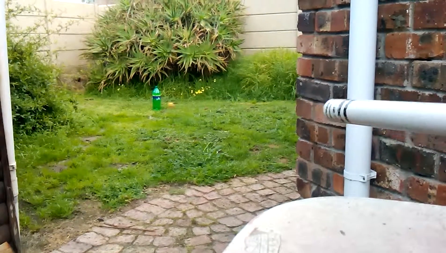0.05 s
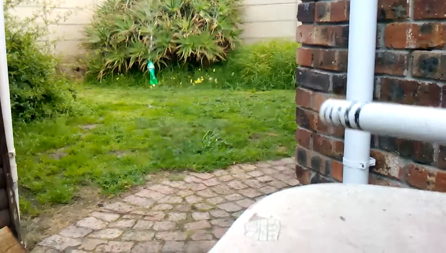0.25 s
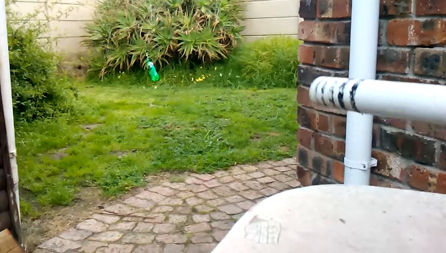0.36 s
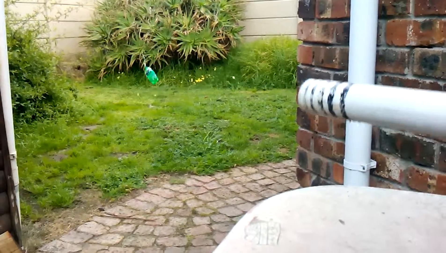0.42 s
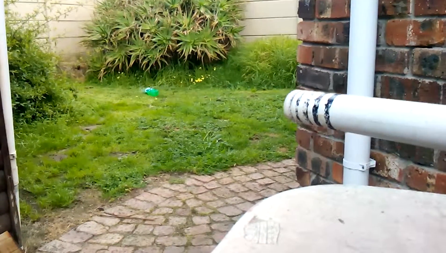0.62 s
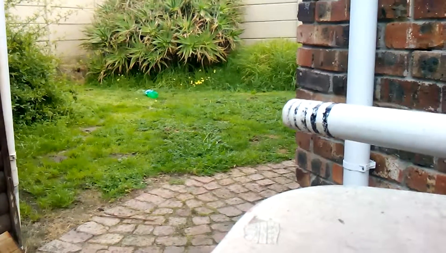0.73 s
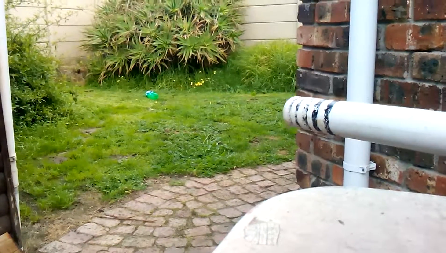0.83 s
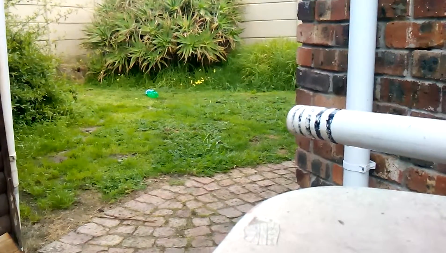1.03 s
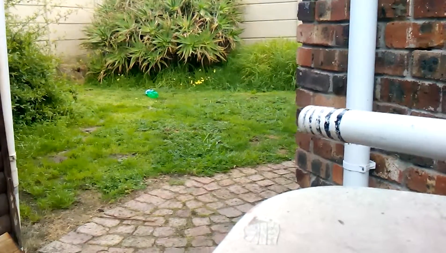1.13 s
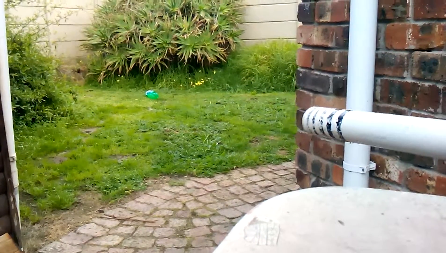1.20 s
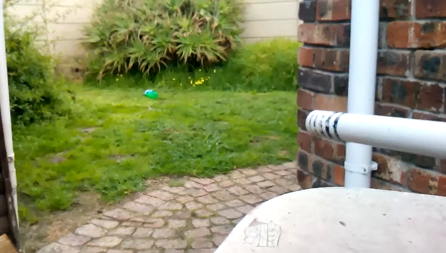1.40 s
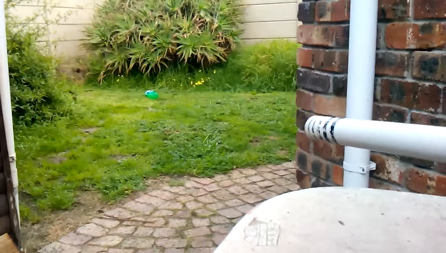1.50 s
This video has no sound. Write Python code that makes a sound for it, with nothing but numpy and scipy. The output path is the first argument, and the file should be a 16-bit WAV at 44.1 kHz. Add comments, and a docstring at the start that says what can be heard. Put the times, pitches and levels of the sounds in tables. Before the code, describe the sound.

An air-driven pipe cannon clicks, hisses briefly and fires an overloaded bang outdoors beside a phone microphone; short echoes, heavy bumps and plastic ticks follow, then lighter pipe knocks fade into a quiet yard.

```python
"""Air cannon in a yard

An air-driven pipe cannon fires in a walled yard beside a hand-held phone: trigger clicks, leaking air, an
overloading blast and its echoes, all made of shaped noise. Bumps are short sagging swings, plastic ticks and
two sharp early echoes are fading noise, and the knocked pipe and a small metal fitting ring in decaying modes.
Under them are a low handling rumble with thin squeaks, and a quiet yard with a cricket, a hiss and faint pairs
of steady high tones."""
import sys
import numpy as np
from scipy import signal
from scipy.fft import rfft, irfft
from scipy.io import wavfile
from scipy.ndimage import uniform_filter1d

SR = 44100
rng = np.random.default_rng(int(sys.argv[2]) if len(sys.argv) > 2 else 0)


def ratio_of_db(decibels):
    """Turn decibels (scalar or array-like) into linear amplitude factors; 0 dB maps to 1."""
    return 10 ** (np.asarray(decibels, float) / 20)


def master(y):
    """Save y as 16-bit WAV."""
    cut = np.clip(np.atleast_2d(y).T, -1, 1)
    pcm = np.round(cut * 32767)  # scale
    wavfile.write(sys.argv[1], SR, pcm.astype(np.int16))


N = 68355
T = np.arange(N) / SR  # time in seconds


def unit(x):
    """Scale to an rms (average strength) of 1."""
    return x / np.sqrt(np.mean(x ** 2))


def noise(colour):
    """Noise of rms 1 whose spectrum follows rows of frequency in Hz and level in dB."""
    hz = np.maximum(np.fft.rfftfreq(N, 1 / SR), 1)
    rows = np.array(colour)
    db = np.interp(np.log(hz), np.log(rows[:, 0]), rows[:, 1], left=-50, right=-60)
    return unit(irfft(rfft(rng.standard_normal(N)) * ratio_of_db(db), N))


def curve(rows, column=1):
    """Join one column of a table by straight lines in time."""
    r = np.array(rows)
    return np.interp(T, r[:, 0], r[:, column])


def burst(start, db, hold, t60):
    """Envelope: a 1.2 ms rise, a hold, then an exponential fall of 60 dB in t60 seconds."""
    since = T - start
    fall_db = 60 * np.clip(since - hold, 0, None) / t60
    return ratio_of_db(db - fall_db) * np.clip(since / 0.0012, 0, 1)


def ring(x, hz, t60):
    """One mode, a decaying sine, struck by x."""
    pole = np.exp(2j * np.pi * hz / SR - np.log(1000) / (t60 * SR))
    return signal.lfilter([1], [1, -pole], x).imag


def flicker(rate):
    """Random wavering of rms 1: noise averaged twice over 1/rate seconds."""
    width = int(SR / rate)
    return unit(uniform_filter1d(uniform_filter1d(rng.standard_normal(N), width), width))


# Colour of the distant hum. Each row: frequency in Hz, relative level in dB.
YARD_COLOUR = [(30, -17.5), (190, 0), (300, -6), (1150, -14.5), (2800, -30), (16000, -30)]
# Faint treble hiss. Each row: time in seconds, level in dB.
HISS_LEVEL = [(.45, -38), (.55, -61), (.66, -46.5), (.72, -50), (1.0, -69.5), (1.55, -56)]
# Colour of that hiss. Each row: frequency in Hz, relative level in dB.
HISS_COLOUR = [(1500, 0), (3800, -3.5), (6000, -13.5), (10500, -5.5), (16000, -23.5)]
# Faint pairs of steady high tones. Each entry: start in seconds.
TONE_STARTS = [1.15, 1.21, 1.302]


def yard():
    """Steady hum, a faint hiss, a cricket (noise-driven ring, pulsed on and off) and high tone pairs."""
    hum = noise(YARD_COLOUR) * ratio_of_db(-52.5)
    hiss = noise(HISS_COLOUR) * ratio_of_db(curve(HISS_LEVEL)) * (T > HISS_LEVEL[0][0])

    pulses_per_s, cricket_hz, cricket_db = 27, 8900, -65
    pulse_on = np.sin(2 * np.pi * pulses_per_s * T + 2.2 * flicker(8)) > 0
    gate = uniform_filter1d(1. * pulse_on, size=120)  # soften the edges
    chirp = unit(ring(rng.standard_normal(N), cricket_hz, .012))
    cricket = chirp * gate * ratio_of_db(cricket_db + 2.5 * flicker(9))

    length_s, tone_db = .045, -66  # level of each tone
    on = sum(np.clip(np.minimum(T - s, s + length_s - T) / .004, 0, 1) for s in TONE_STARTS)
    tones = sum(np.sin(2 * np.pi * hz * T) for hz in (10400, 10830))
    return hum + hiss + cricket + ratio_of_db(tone_db) * on * tones


# Trigger clicks. Each row: start in seconds, level in dB (all lowered by 7.5 dB below),
# time to fall 60 dB in seconds.
TRIGGER_CLICKS = [(0.146, -13.5, 0.029), (0.1531, -17.5, 0.011), (0.159, -21.5, 0.12)]
# Colour of the clicks. Each row: frequency in Hz, relative level in dB.
TRIGGER_COLOUR = [(300, -22), (1200, -8), (2600, -6), (7000, -8.5), (9500, -0.5), (16000, -9.5)]
# Air escaping as the valve opens. Each row: time in seconds, level in dB before flickering.
LEAK_LEVEL = [(.185, -35), (.199, -36), (.203, -28), (.21, -23.5), (.217, -17.5), (.224, -20),
              (.232, -20.5)]
# Colour of the leak. Each row: frequency in Hz, relative level in dB.
LEAK_COLOUR = [(200, 4.5), (1100, -3.5), (2000, -6.5), (5000, -6.5), (8000, -11), (16000, -5.5)]


def trigger():
    """Clicks of the trigger as noise bursts, then air hissing past the valve as flickering noise."""
    click_shape = sum(burst(s, db - 7.5, 0.0015, t60) for s, db, t60 in TRIGGER_CLICKS)
    clicks = noise(TRIGGER_COLOUR) * click_shape
    fade_in = np.clip((T - LEAK_LEVEL[0][0]) / 0.0033, 0, 1)
    fade_out = np.clip((.245 - T) / 0.018, 0, 1)
    leak = noise(LEAK_COLOUR) * ratio_of_db(curve(LEAK_LEVEL) + 0.92 * flicker(300))
    return clicks + leak * fade_in * fade_out


# Handling rumble. Each row: time in seconds, level in dB.
RUMBLE_LEVEL = [(.2, -27), (.24, -42), (.36, -26.5), (.45, -26), (.52, -28), (.56, -32), (.63, -21),
                (.70, -37.5), (.75, -21), (.83, -25.5), (.89, -30.5), (.93, -40), (1.08, -48), (1.155, -52),
                (1.24, -32), (1.33, -40), (1.55, -59.5)]
# Colour of the rumble. Each row: frequency in Hz, relative level in dB.
RUMBLE_COLOUR = [(30, -18.5), (100, -6), (137, -1), (180, -12), (300, -14)]
# Thin squeaks. Each row: start in seconds, length in seconds, pitch in Hz, peak level in dB.
SQUEAKS = [(1.092, 0.029, 1940, -54), (1.113, 0.038, 2030, -50.5)]


def handling():
    """Low noise rumbling through the phone's case, and squeaks that are sines swelling and fading."""
    out = noise(RUMBLE_COLOUR) * ratio_of_db(curve(RUMBLE_LEVEL))
    out = out * np.clip((T - RUMBLE_LEVEL[0][0]) / .02, 0, 1)
    for start, length, hz, db in SQUEAKS:
        progress = np.clip((T - start) / length, 0, 1)
        out = out + ratio_of_db(db) * np.sin(np.pi * progress) * np.sin(2 * np.pi * hz * T)
    return out


# Boom of the barrel. In order: start in seconds, level in dB, hold in seconds, 60 dB fall in seconds.
BOOM = (.2315, 0.67, 0.024, 0.33)
# Crack of the air jet, a moment later. In order: start in seconds, level in dB before flickering,
# hold in seconds, 60 dB fall in seconds.
JET = (.2385, -2.7, 0.017, 0.157)
# Colour of the boom. Each row: frequency in Hz, relative level in dB.
BOOM_COLOUR = [(30, -32), (200, -16.5), (340, 0), (500, 0.5), (850, -10), (1150, -8.5), (2000, -26.5)]
# Colour of the crack. Each row: frequency in Hz, relative level in dB.
JET_COLOUR = [(1200, -10), (2400, 7.5), (2900, 1.5), (3600, 8.5), (5600, -6.5), (16000, -10)]
# Echoes round the yard, with the dull body of a soft knock near .676 s. Each row: time in seconds,
# level in dB before tilt and flicker, treble tilt in dB per octave above 1 kHz.
ECHO_COURSE = [(.29, -8.5, -21), (.315, -23, 6.5), (.345, -20, 4), (.39, -12.5, -1.5), (.44, -13, -1),
               (.465, -24.5, -0.5), (.53, -26, 0), (.57, -26, -3.5), (.65, -37.5, -2), (.676, -23.5, -9),
               (.71, -41, 1), (.9, -49.5, 0)]
# Colour of the echoes and that knock before tilting. Each row: frequency in Hz, relative level in dB.
ECHO_COLOUR = [(60, -20), (240, 1.5), (450, -1), (700, -5.5), (1110, 3), (1800, -13.5), (3500, -14.5),
               (5500, -30), (16000, -44)]


def blast():
    """Boom, jet crack, then echoes (and a soft knock's body) as noise of varying level and tilt."""
    boom = noise(BOOM_COLOUR) * burst(*BOOM)
    jet = noise(JET_COLOUR) * burst(*JET) * ratio_of_db(flicker(130))
    spectrum = rfft(noise(ECHO_COLOUR))
    octave = np.log2(np.maximum(np.fft.rfftfreq(N, 1 / SR), 1) / 1000)  # octaves above 1 kHz
    tilt = curve(ECHO_COURSE, column=2)
    echo = 0
    for k in range(5):  # overlapping bands an octave apart, each flickering on its own
        share = np.clip(1 - abs(np.clip(octave, 0, 4) - k), 0, 1)
        echo = echo + irfft(spectrum * share, N) * ratio_of_db(k * tilt + 0.51 * flicker(51))
    fade_out = np.clip(10 * (1 - T), 0, 1)  # silent from 1 s on
    return boom + jet + echo * ratio_of_db(curve(ECHO_COURSE)) * (T > JET[0]) * fade_out


# Plastic ticks, led by two sharp echoes of the blast (the first two rows). Each row: start in seconds, level in
# dB (before a fixed trim and the opening spike), lowest frequency in Hz, tilt in dB per octave, time for the
# tail to fall 60 dB in seconds.
TICKS = [(0.3114, -11, 3000, -3.5, 0.0091), (0.337, -10.5, 3520, -19.5, 0.013),
         (0.4701, -6.5, 700, -4, 0.025), (.5066, -25.5, 4000, -4, .012), (0.541, -23, 2870, 0.5, 0.0095),
         (.5738, -24, 3000, 2, 0.019), (0.5911, -9.5, 801, -5.5, 0.035), (0.6015, -11, 4440, -8, 0.014),
         (0.6188, -15.5, 975, -4, 0.036), (0.6246, -16.5, 797, -6.5, 0.053), (0.6688, -27, 700, -2, 0.05),
         (0.7354, -19, 930, -5, 0.05), (0.7459, -6, 4250, -6, 0.013), (0.7608, -14.5, 704, -7.5, 0.028),
         (.7720, -17.5, 1100, -5.5, .035), (0.8167, -27, 1170, -7, 0.1), (0.8631, -35, 1500, -8, 0.019),
         (1.3034, -37.5, 3000, 2, 0.018)]


def ticks():
    """Short cracks of plastic, and two sharp echoes of the blast: band-limited noise with a 4 ms spike over a
    longer fading rattle."""
    n = 4096
    out, t = np.zeros(N), T[:n]
    hz = np.maximum(np.fft.rfftfreq(n, 1 / SR), 1)
    for (start, db, low_hz, tilt_db, t60), grit in zip(TICKS, rng.standard_normal((len(TICKS), n))):
        tilted = rfft(grit) * ratio_of_db(tilt_db * np.log2(hz / low_hz))
        band = unit(irfft(tilted / (1 + (low_hz / hz) ** 6) / (1 + (hz / 15000) ** 6), n))
        rattle = ratio_of_db(-60 * t / t60)
        spike = ratio_of_db(4 - 60 * t / .004)
        i = int(start * SR)
        out[i:i + n] += band * ratio_of_db(db - 10) * (rattle + spike) * np.clip(t / .0002, 0, 1)
    return out


# Bumps felt by the phone. Each row: centre in seconds, peak level in dB, pitch in Hz at the centre,
# length in cycles.
BUMPS = [(.4540, -4, 297, 1.35), (0.4608, 6, 205, 0.87), (.4735, -2, 400, 1.5), (.4760, 6.5, 151, 0.43),
         (0.516, -7, 111, 0.69), (.5755, -6.5, 303, 0.56), (0.5814, -1, 172, 0.52), (0.5934, 2, 327, 1.13),
         (.5960, 2, 173, 1.5), (0.625, -5, 355, 1.23), (0.6301, -4.5, 164, 0.59), (0.7279, -3.5, 238, 0.94),
         (0.739, -3, 149.6, 0.83), (0.7634, -6.5, 432, 2), (0.773, -11, 256, 1.6), (0.7792, -14, 157, 0.74)]


def bumps():
    """Each bump is a short swing under a bell-shaped envelope, its pitch sagging as it passes."""
    sag, out = 0.66, 0  # sag: overall drop as a share of the centre pitch
    for centre, db, hz, cycles in BUMPS:
        u = np.clip((T - centre) * hz, -6, 6)  # time counted in cycles
        swing = np.cos(2 * np.pi * (u - sag * u * np.tanh(u) / 2))
        out = out + ratio_of_db(db) * np.exp(-(2 * u / cycles) ** 2) * swing
    return out


# Knocks on the pipe. Each row: start in seconds, peak level of the ringing in dB, contact time in ms,
# travel time in ms of the lowest ring (higher bending waves arrive sooner).
KNOCKS = [(0.669, -22, 0.35, 2), (0.8225, -21.5, 0.5, 2), (0.892, -25, .7, 2), (0.933, -26.5, .8, 2),
          (1.0085, -19, 0.5, 8), (1.0950, -20, 1.0, 2), (1.1165, -21, .9, 2), (1.1580, -13.5, .5, 1.5),
          (1.1918, -11.5, 0.22, 1.8), (1.2095, -21.5, 0.3, 1.5), (1.278, -30, 1.4, 1.5),
          (1.302, -26, 1.0, 1.5), (1.439, -33, 0.3, 2.5)]
# Ringing modes of the pipe. Each row: frequency in Hz and level in dB before each knock's own
# variation, time to fall 60 dB in seconds (shortened for the shuffle).
PIPE_MODES = [(275, -1, .06), (390, -4, .045), (506, -1, .045), (730, -1, .035), (1070, -1.5, .03),
              (1410, -8, .022), (2130, -12, .022), (3500, -22, .015)]
# The pipe shuffling on its rest. Each row: time in seconds, level in dB.
SHUFFLE_LEVEL = [(.48, -22.5), (.64, -34.5), (.705, -30.5), (.80, -35.5), (.83, -30), (.88, -34),
                 (.92, -38), (.96, -31.5), (1.07, -30.5), (1.13, -38.5), (1.15, -60.5), (1.225, -36.5),
                 (1.26, -44.5), (1.34, -54.5), (1.55, -42.5)]


def pipe():
    """Knocks and jolts ring the pipe; longer contact is duller, and each knock adds a dry clack."""
    n = 4096
    out, t, t_ms = np.zeros(N), T[:n], T[:n] * 1000
    spread_db, detune = 2, .012  # random variation of each mode's level, and of its pitch as a share
    clack_db, clack_t60 = -13, 0.06  # dB against the ringing's peak, seconds
    clack_noise = noise([(300, 3), (700, 2.5), (1500, -5), (5000, -27), (9000, -28)])
    variation = rng.standard_normal((len(KNOCKS), len(PIPE_MODES), 2))
    for (start, db, contact_ms, travel_ms), own in zip(KNOCKS, variation):
        i = int(start * SR)
        ringing = 0
        for k, ((hz, mode_db, t60), (a, b)) in enumerate(zip(PIPE_MODES, own)):
            arrival_ms = contact_ms + travel_ms * np.sqrt(PIPE_MODES[0][0] / hz)
            push = -np.exp(-((t_ms - arrival_ms) / (.4 * contact_ms)) ** 2)
            mode = ring(push, hz * (1 + detune * b), t60)
            ringing = ringing + (-1) ** k * ratio_of_db(mode_db + spread_db * a) * mode
        push = np.exp(-((t_ms - contact_ms) / (.4 * contact_ms)) ** 2)
        clack = unit(signal.lfilter(push[:128] ** 4, 1, clack_noise[i:i + n]))
        clack = clack * ratio_of_db(clack_db - 60 * t / clack_t60)
        clack = clack * np.clip((t_ms - travel_ms / 2) / contact_ms, 0, 1)
        out[i:i + n] += ratio_of_db(db) * (ringing / abs(ringing).max() + clack)

    jolts_per_s, jolt_spread_db = 1200, 4
    jolts = (rng.random(N) < jolts_per_s / SR) * ratio_of_db(jolt_spread_db * rng.standard_normal(N))
    jolts = jolts * np.sign(rng.standard_normal(N))  # random direction
    jolts = uniform_filter1d(uniform_filter1d(jolts, size=20), size=20)
    shuffle = unit(sum(ratio_of_db(db) * ring(jolts, hz, 0.4 * t60) for hz, db, t60 in PIPE_MODES))
    return out + shuffle * ratio_of_db(curve(SHUFFLE_LEVEL)) * (T > SHUFFLE_LEVEL[0][0])


# Clinks of a small metal fitting. Each row: time in seconds, level in dB that the modes add to.
CLINKS = [(.817, -48), (1.0115, -55), (1.193, -57)]
# Modes of the fitting. Each row: frequency in Hz, relative level in dB before each clink's own
# variation, time to fall 60 dB in seconds.
FITTING_MODES = [(2150, -1, .13), (3090, -2, .13), (3290, -2, .13), (3740, -6, .1), (4780, -7, .1)]


def fitting():
    """Each clink is a single-sample hit that rings the fitting's thin modes in its own balance."""
    out, spread_db = 0, 2
    variation = rng.standard_normal((len(CLINKS), len(FITTING_MODES)))
    for (time, db), own in zip(CLINKS, variation):
        hit = 1. * (np.arange(N) == int(time * SR))
        for (hz, mode_db, t60), a in zip(FITTING_MODES, own):
            out = out + ratio_of_db(db + mode_db + spread_db * a) * ring(hit, hz, t60)
    return out


def scene():
    """Everything added together, in mono."""
    mix = yard() + trigger() + handling() + blast() + ticks() + bumps() + pipe() + fitting()
    return mix[None, :]


def band_limit(x):
    """A steep low-pass at the top of the band."""
    return signal.sosfilt(signal.butter(12, 16780, fs=SR, output="sos"), x)


def record(dry):
    """The phone's microphone weakens the bass below 70 Hz and clips just under full scale."""
    mic = signal.sosfilt(signal.butter(2, 70, "high", fs=SR, output="sos"), dry)
    ceiling = ratio_of_db(-.2)
    mix = np.clip(mic, -ceiling, ceiling)
    return band_limit(mix)


dry = scene()
out = record(dry)
master(out)
```